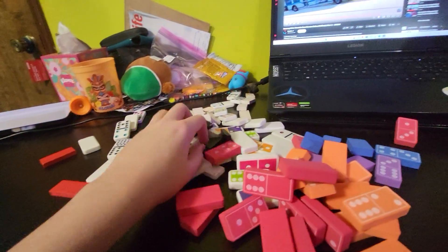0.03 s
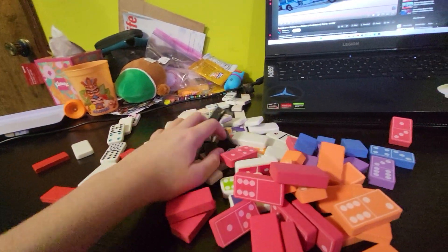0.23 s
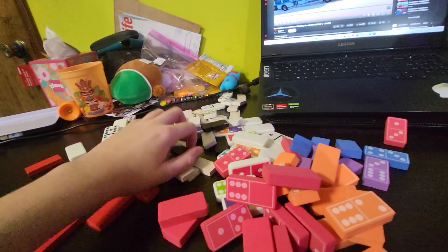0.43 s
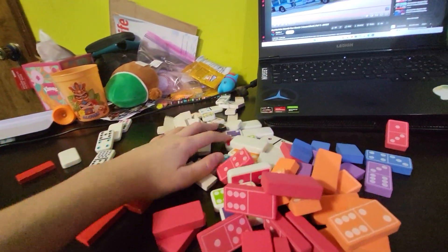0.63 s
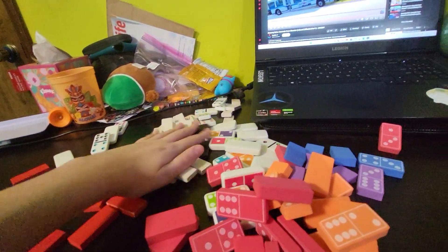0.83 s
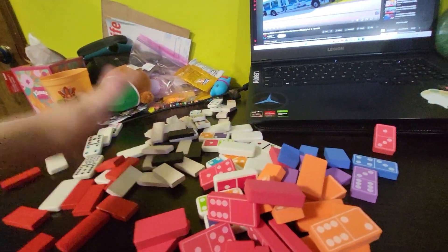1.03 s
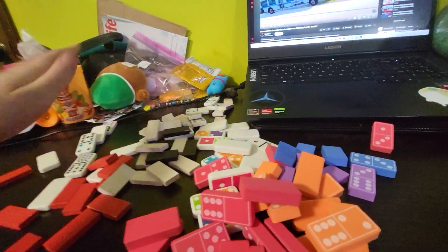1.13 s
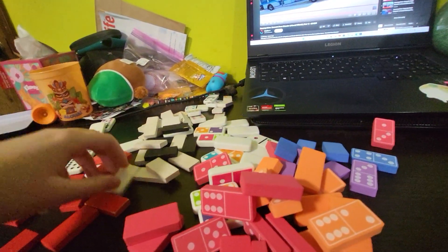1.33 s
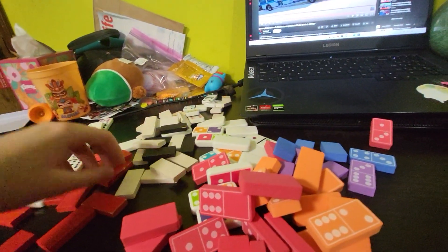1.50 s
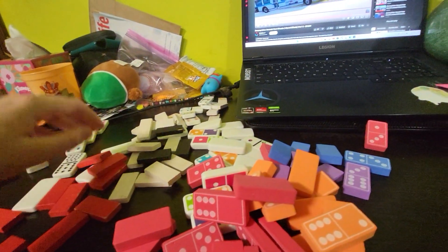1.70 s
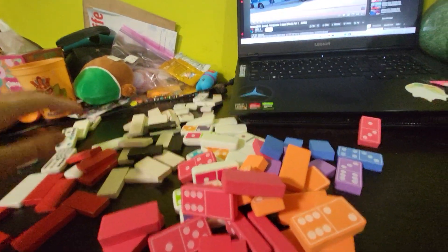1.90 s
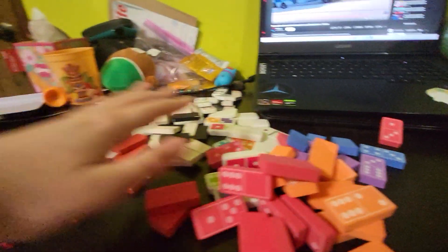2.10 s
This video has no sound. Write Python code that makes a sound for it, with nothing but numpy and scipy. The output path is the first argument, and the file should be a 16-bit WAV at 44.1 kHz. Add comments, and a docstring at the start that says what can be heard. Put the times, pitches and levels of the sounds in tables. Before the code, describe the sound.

Hard plastic dominoes clatter and click as a hand stirs a heap on a desk, which rumbles softly underneath. After a short pause one more tile drops. The sound is close, slightly right, in a small room.

```python
"""A desk in a small room: a hand stirs a heap of hard plastic dominoes, lifts away, then drops one more.
Each impact excites damped vibrations of a tile, heard as a clack at its own pitch, a sharp snap and a
brief high ring. Smaller tiles jostle underneath, and the desk top, driven by the heap, thuds and rumbles.
The heap lies to the right; a laptop fan runs quietly, and the walls add a short reverberation."""
import sys
import numpy as np
from scipy import signal
from scipy.fft import rfft, irfft, next_fast_len
from scipy.io import wavfile

SR = 44100
rng = np.random.default_rng(int(sys.argv[2]) if len(sys.argv) > 2 else 0)


def bounce(signal):
    """Save signal as a 16-bit WAV file at the path given by the first command-line argument."""
    frames = np.transpose(np.atleast_2d(signal))
    limited = np.clip(frames, -1, 1)
    pcm = np.round(limited * 32767).astype(np.int16)
    wavfile.write(sys.argv[1], SR, pcm)


N = 94815

# Spectrum of the room air and the fan. Each row: frequency in Hz, relative level in dB.
AIR_SPECTRUM = [(20, -32), (58, -1.5), (100, -8), (380, -15.5), (490, -23.5), (700, -19), (1150, -33),
                (1650, -24), (2050, -42), (6000, -57), (15500, -45.5)]
# Reverberation of the room. Each row: frequency in Hz, time to decay by 60 dB in seconds.
REVERB_TIMES = [(500, 0.18), (1800, 0.14), (12000, 0.12)]
# Envelope of the desk's rumble under hand and tiles. Each row: time in seconds, level in dB.
RUMBLE_ENVELOPE = [(0, -54), (.27, -59), (.34, -39), (.48, -39.5), (.55, -50), (.88, -51.5), (1.1, -74.5)]
# Soft bumps on the desk. Each row: start in seconds, peak level in dB, pitch in Hz.
DESK_BUMPS = [(0.598, -47, 62.5), (0.848, -46.5, 99), (1.931, -48.5, 59)]
# Response of the desk to sliding and to a knock. Each row: frequency in Hz, relative level in dB.
RUMBLE_SPECTRUM = [(40, -18.5), (140, 4.5), (270, -7.5), (345, 11.5), (430, -13.5), (1000, -34)]
THUD_SPECTRUM = [(130, -24.5), (330, -5.5), (480, -20), (720, 7), (1300, -22.5)]
# Envelope of the small tiles' jostling. Each row: time in seconds, level in dB.
JOSTLE_ENVELOPE = [(0, -47.5), (.05, -38), (.15, -49), (.24, -30), (.31, -46.5), (.34, -27), (.44, -36.5),
                   (.62, -36.5), (.87, -37), (.93, -47), (1.04, -89), (1.362, -94.5), (1.378, -37),
                   (1.5, -83.5)]
# Spectrum of their light touches. Each row: frequency in Hz, relative level in dB.
JOSTLE_SPECTRUM = [(200, -22), (750, -1.5), (1100, -2), (2200, 3.5), (6800, -18.5), (9000, -15.5),
                   (11300, -31.5)]
# Noise in a knock's clack, snap and ring. Each row: frequency in Hz, relative level in dB.
CLACK_SPECTRUM = [(400, -47.5), (800, -14), (1150, -14), (1600, 3), (2300, 2), (3000, 2), (5000, -35.5)]
SNAP_SPECTRUM = [(1500, -27.5), (2800, -9), (3800, 1), (5300, -4.5), (6500, -9.5), (11000, -23.5),
                 (15500, -38.5)]
RING_SPECTRUM = [(4000, -27), (7000, 2), (8400, 4), (9800, 7), (11300, -16), (12800, -3.5), (15600, -16.5)]
# Edges that graze without a clack. Each row: start in seconds, relative level of snap and ring in dB.
EDGE_GRAZES = [(0.171, -43), (0.36, -29), (0.517, -27.5), (0.536, -32), (0.562, -30.5), (0.658, -41.5),
               (0.7071, -35.5)]
# Tile impacts. Each row: start in seconds, clack pitch in Hz, relative clack, snap and ring levels in dB.
TILE_KNOCKS = [(0.0435, 2300, -27, -33, -47), (0.067, 2400, -32.5, -35, -57), (0.0989, 2000, -37, -55, -69),
               (0.2081, 2500, -25.5, -23.5, -25), (0.2379, 2000, -29, -45, -51),
               (0.2915, 3800, -28, -29.5, -59.5), (0.3205, 2180, -10, -21.5, -28),
               (0.3515, 2450, -16, -30, -43.5), (0.369, 2800, -24, -26.5, -31),
               (0.376, 2400, -14, -22.5, -28.5), (0.4139, 2200, -21, -32.5, -60),
               (0.4172, 3040, -17.5, -31, -56), (0.4533, 2430, -11.5, -16.5, -21),
               (0.484, 2420, -16, -23, -35), (0.4872, 3020, -15.5, -32.5, -34),
               (0.4902, 2150, -21.5, -21, -24.5), (0.541, 3000, -23, -23.5, -29),
               (0.5656, 2600, -23.5, -25.5, -13), (0.568, 2300, -31, -39, -15.5),
               (0.5994, 2500, -25, -23.5, -20), (0.607, 2550, -20.5, -25.5, -29),
               (0.62, 2200, -23, -31, -47), (0.631, 1750, -22, -42.5, -54), (0.664, 2300, -28, -35, -58),
               (0.69, 2100, -29.5, -37.5, -38), (0.737, 2200, -27, -29, -32.5),
               (0.7626, 2780, -18, -17.5, -28), (0.7642, 4400, -23.5, -26, -36),
               (0.8634, 3340, -22, -34, -41), (0.906, 2300, -26.5, -35, -30),
               (1.3987, 1950, -29.5, -40, -39.5), (1.4234, 2800, -22.5, -26.5, -15),
               (1.425, 1700, -31.5, -24, -13), (1.452, 2900, -30.5, -34.5, -45),
               (1.495, 2140, -34.5, -45.5, -75.5)]

RESPONSE_SAMPLES, CLICK_SAMPLES = 16384, 132
RESPONSE_TIME = np.arange(RESPONSE_SAMPLES) / SR
HEAP_RING_HZ, DROP_RING_HZ, OVERTONE_HZ = 8870, 9620, 15550
HEAP_TONE_DB, DROP_TONE_DB = -5, -16  # landing flat on the desk damps the ring's pure tone
HEAP_THUD_DB, DROP_THUD_DB = -19.5, -15  # and thuds more; both relative to the clack
CLACK_PAN_DB, SNAP_PAN_DB, RING_PAN_DB = -14, -4, -7.5  # left minus right, for a knock in the heap


def amp(db):
    """Amplitude ratio of a level in decibels."""
    return 10 ** (np.asarray(db) / 20)


def unit(x):
    """Normalisation to an rms of 1."""
    return x / np.sqrt(np.mean(x ** 2) + 1e-20)


def along(points, hz):
    """Interpolation of (Hz, value) points on a logarithmic frequency axis."""
    frequencies, values = np.transpose(points)
    return np.interp(np.log(hz + 1), np.log(frequencies + 1), values)


def envelope(rows):
    """Exponential growth and decay between (seconds, dB) points, as a gain per sample."""
    times, db = np.transpose(rows)
    return amp(np.interp(np.arange(N) / SR, times, db))


def pan(db):
    """Direction by level difference: left and right gains of mean power 1."""
    return unit(amp([[db / 2], [-db / 2]]))


def minimum_phase(spectrum):
    """Causality: folding the cepstrum onto positive time gives a minimum-phase frequency response."""
    hz = np.fft.rfftfreq(RESPONSE_SAMPLES, 1 / SR)
    cepstrum = irfft(np.log(amp(along(spectrum, hz))))
    cepstrum[1:RESPONSE_SAMPLES // 2] *= 2
    cepstrum[RESPONSE_SAMPLES // 2 + 1:] = 0
    return np.exp(rfft(cepstrum))


def coloured(x, spectrum):
    """Linear filtering: convolution imposes the spectrum; the result has an rms of 1."""
    response = irfft(minimum_phase(spectrum))
    return unit(signal.fftconvolve(x, response[None], axes=1)[:, :N])


def click_sized(x):
    """Equal energy: each channel carries that of 3 ms at an rms of 1."""
    return x * np.sqrt(CLICK_SAMPLES) / np.linalg.norm(x, axis=-1, keepdims=True)


def add(out, start_s, x):
    """Superposition of x on out from the given start."""
    start = max(0, round(start_s * SR))
    out[:, start:start + x.shape[1]] += x[:, :N - start]


def centred_noise(spectrum, side_db=-12):
    """Partial coherence: coloured noise common to both channels, with a weaker independent part."""
    return coloured(rng.standard_normal(N) + amp(side_db) * rng.standard_normal((2, N)), spectrum)


def in_room(x, tail_db=-3, rise_s=0.0032):
    """Reverberation: diffuse reflections build up behind the direct sound, and the treble dies first."""
    hz, t, noise = signal.stft(rng.standard_normal((2, RESPONSE_SAMPLES)), SR, nperseg=256)
    fade = amp(-60 * t / along(REVERB_TIMES, hz)[:, None]) * (1 - np.exp(-t / rise_s))
    tail = signal.istft(noise * fade, SR, nperseg=256)[1]
    tail /= np.linalg.norm(tail, axis=1, keepdims=True)
    source = unit(x[1:]) * np.sqrt(np.mean(x ** 2))  # right channel at the rms of both
    reflections = signal.fftconvolve(source, tail, axes=1)[:, :x.shape[1]]
    return x + amp(tail_db) * pan(db=-2.5) * reflections


def air_and_fan(level_db=-59.5):
    """Stationary noise: room air and the laptop fan make a steady, low hush."""
    return amp(level_db) * centred_noise(AIR_SPECTRUM)


def desk(bump_rise_s=0.038):
    """Forced vibration: the desk top rumbles under the sliding heap and booms softly when bumped."""
    out = envelope(RUMBLE_ENVELOPE) * centred_noise(RUMBLE_SPECTRUM)
    swell = (RESPONSE_TIME / bump_rise_s * np.exp(1 - RESPONSE_TIME / bump_rise_s)) ** 2
    for start, db, hz in DESK_BUMPS:
        boom = swell * np.sin(2 * np.pi * hz * RESPONSE_TIME)
        add(out, start, amp(db) * boom[None])
    return out


def jostle(touches_per_s=380, spread_db=2.5, t60_s=0.009):
    """Incoherent addition: random light touches between tiles, each a dying scrape, sum in power."""
    onsets = rng.random(N) < touches_per_s / SR
    strengths = amp(spread_db * np.clip(rng.standard_normal(N), -2, 2))
    power_decay = amp(-60 / SR / t60_s) ** 2
    power = signal.lfilter([1], [1, -power_decay], onsets * strengths ** 2)
    touches = coloured(np.sqrt(power) * rng.standard_normal((2, N)), JOSTLE_SPECTRUM)
    return in_room(touches * envelope(JOSTLE_ENVELOPE) * pan(db=-3))


def burst(spectrum, t60_s, impact_db=-27):
    """Impulsive excitation: a first contact and decaying scatter from nearby tiles, filtered alike."""
    force = rng.standard_normal((2, RESPONSE_SAMPLES)) * amp(-60 * RESPONSE_TIME / t60_s)
    force /= np.linalg.norm(force, axis=1, keepdims=True)
    force[:, 0] += amp(impact_db)
    return click_sized(irfft(rfft(force) * minimum_phase(spectrum)))


def mode(hz, t60_s):
    """Damped oscillation: a single mode decays exponentially, by 60 dB in t60_s."""
    return click_sized(np.sin(2 * np.pi * hz * RESPONSE_TIME) * amp(-60 * RESPONSE_TIME / t60_s))


def snap_and_ring(snap_db, ring_db, ring_hz, tone_db, pan_share, pitch_spread=0.015):
    """Modal excitation: a contact snaps and sets the tile's high modes ringing amid bright noise."""
    ring_hz *= np.exp(pitch_spread * rng.standard_normal())
    overtone_db = ring_db + 6  # the overtone's share grows with the hardness of the contact
    tone = mode(ring_hz, t60_s=0.013) + amp(overtone_db) * mode(OVERTONE_HZ, t60_s=0.013)
    ring = amp(tone_db) * tone + amp(-6.5) * burst(RING_SPECTRUM, t60_s=0.017)
    snap = burst(SNAP_SPECTRUM, t60_s=0.010)
    return (amp(snap_db) * pan(pan_share * SNAP_PAN_DB) * snap
            + amp(ring_db) * pan(pan_share * RING_PAN_DB) * ring)


def dominoes(drop_after_s=1.2, body_db=-3.5, scatter_db=-2.5):
    """Impact sound: every contact snaps and rings; a full knock also clacks and thuds the desk."""
    out = np.zeros((2, N))
    in_heap = HEAP_RING_HZ, HEAP_TONE_DB, HEAP_THUD_DB, 1
    dropped = DROP_RING_HZ, DROP_TONE_DB, DROP_THUD_DB, 0.43  # lands nearer the middle
    for start, hz, clack_db, snap_db, ring_db in TILE_KNOCKS:
        ring_hz, tone_db, thud_db, pan_share = in_heap if start < drop_after_s else dropped
        place = pan(pan_share * CLACK_PAN_DB)
        body = amp(clack_db + body_db) * place * mode(hz, t60_s=0.014)
        scatter = amp(scatter_db) * place * burst(CLACK_SPECTRUM, t60_s=0.016)
        thud = amp(thud_db) * burst(THUD_SPECTRUM, t60_s=0.083)[0]
        tick = snap_and_ring(snap_db, ring_db, ring_hz, tone_db, pan_share)
        add(out, start, body)  # the clack's pitched part stays close and dry
        add(out, start, in_room(amp(clack_db) * (scatter + thud) + tick))
    for start, db in EDGE_GRAZES:
        graze = snap_and_ring(db, db, HEAP_RING_HZ, HEAP_TONE_DB, pan_share=0.9)
        add(out, start, in_room(graze))
    return out


def scene():
    """Superposition: the sound pressures of tiles, desk and air add."""
    return dominoes() + jostle() + desk() + air_and_fan()


def record(dry):
    """Saturation and band limiting: the highest peaks are rounded, then a steep low-pass acts."""
    ceiling, cutoff_hz = 0.95, 16100
    rounded = dry / (1 + np.abs(dry / ceiling) ** 6) ** (1 / 6)
    padded = next_fast_len(N + RESPONSE_SAMPLES)
    low_pass = 1 / (1 + (np.fft.rfftfreq(padded, 1 / SR) / cutoff_hz) ** 160)
    return irfft(rfft(rounded, padded) * low_pass, padded)[:, :N]


dry = scene()
out = record(dry)
bounce(out)
```